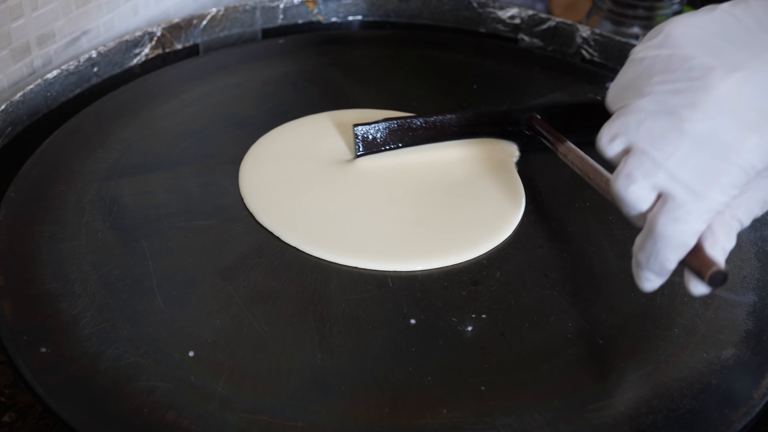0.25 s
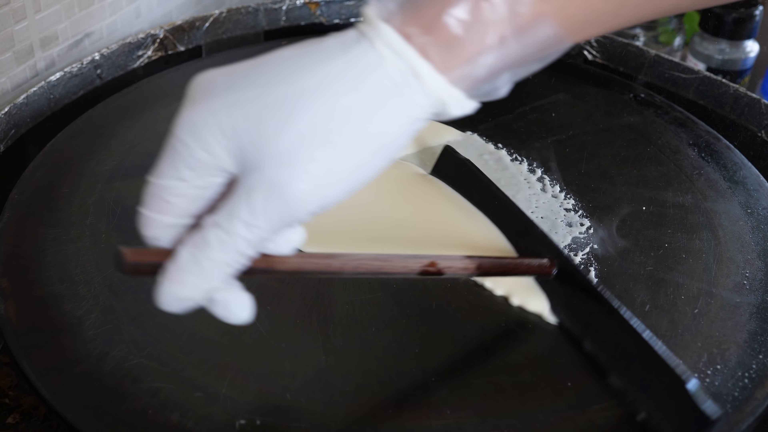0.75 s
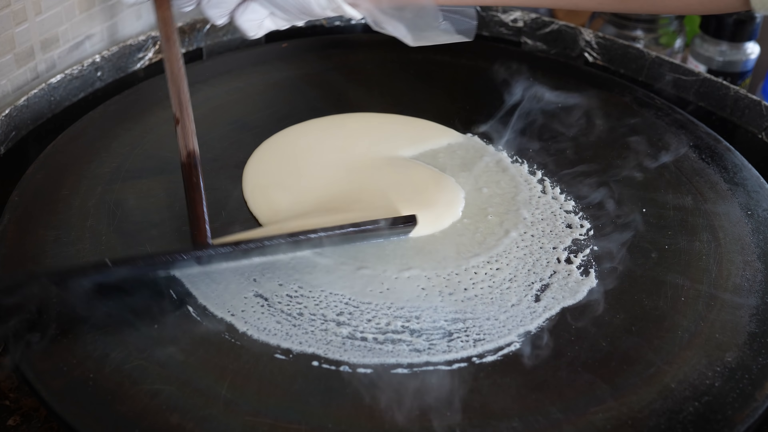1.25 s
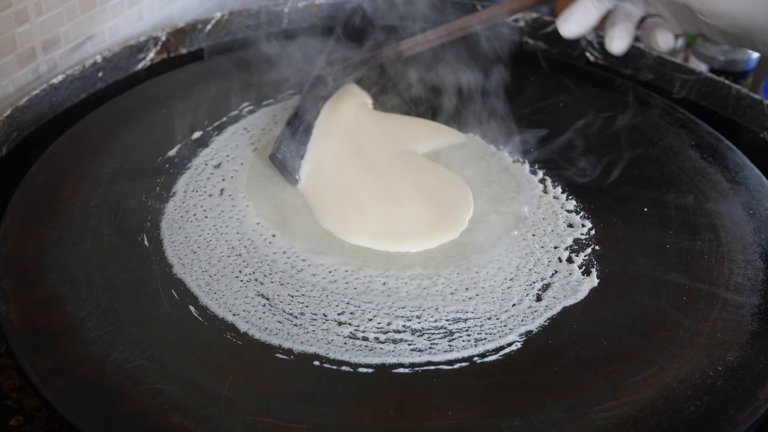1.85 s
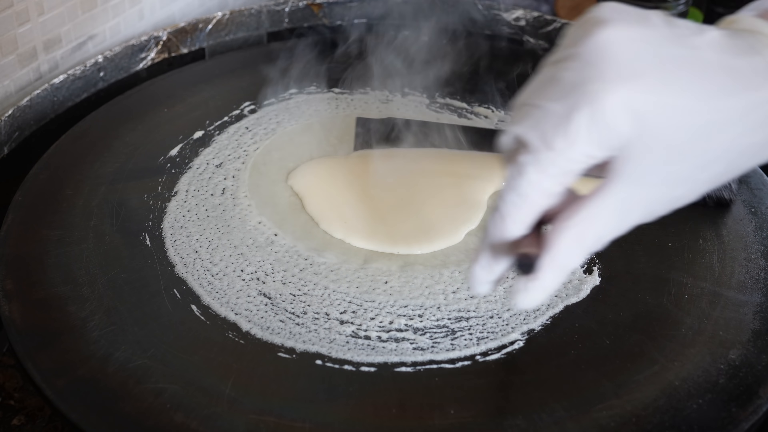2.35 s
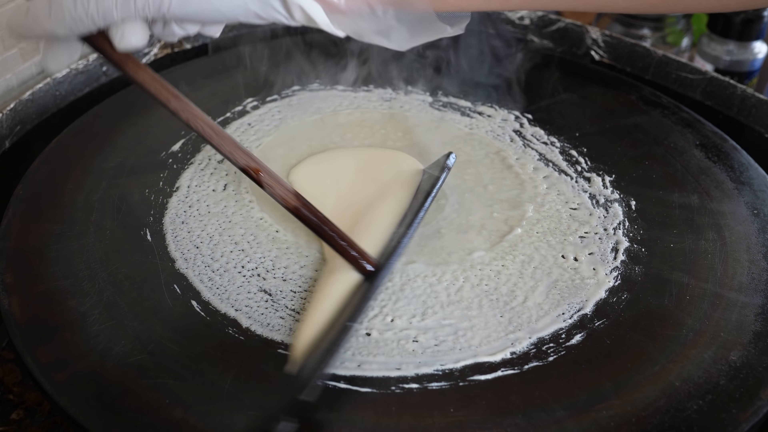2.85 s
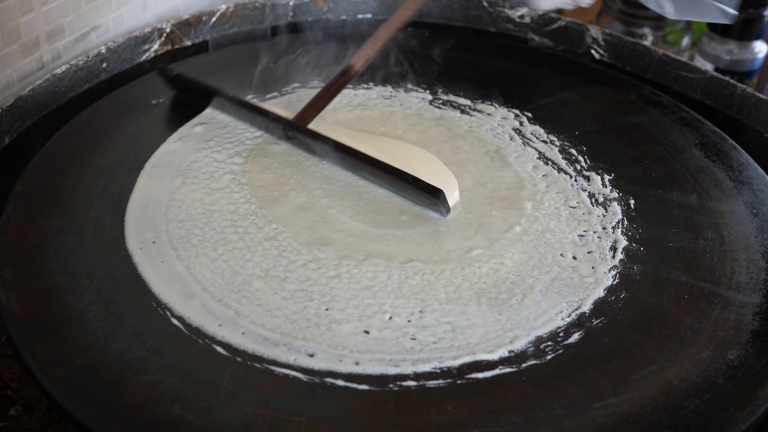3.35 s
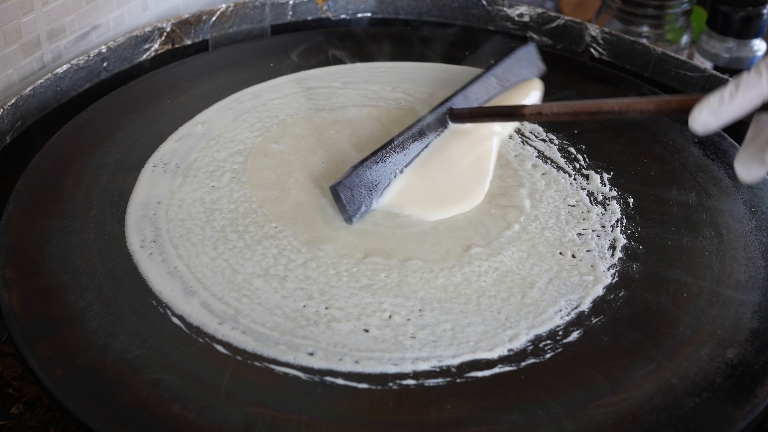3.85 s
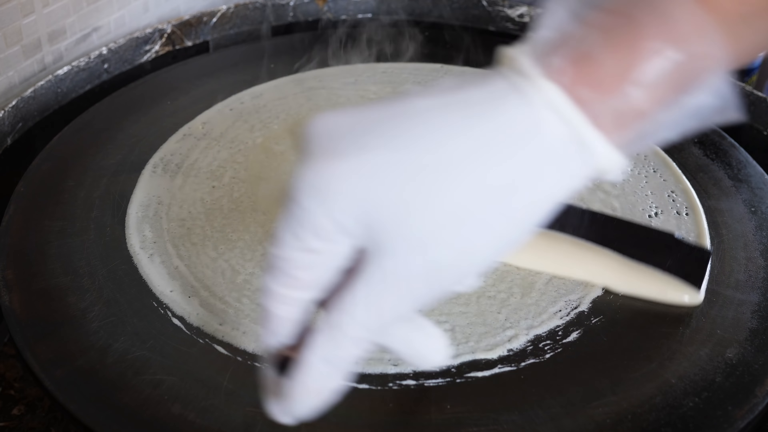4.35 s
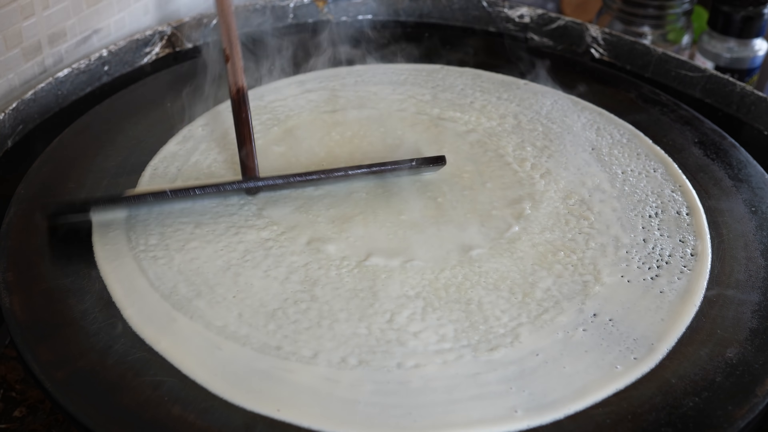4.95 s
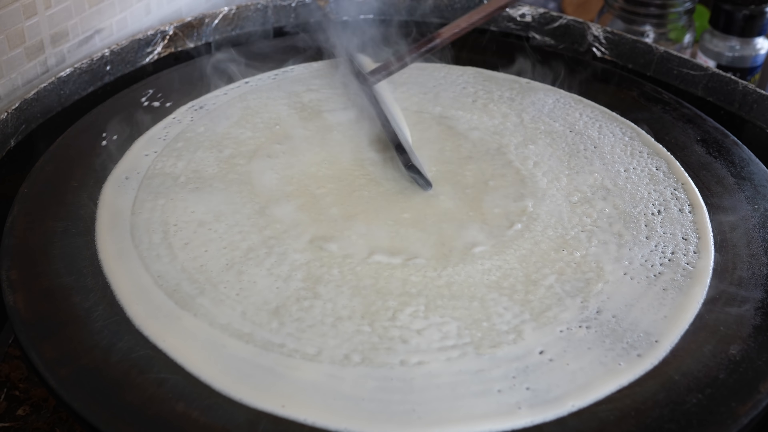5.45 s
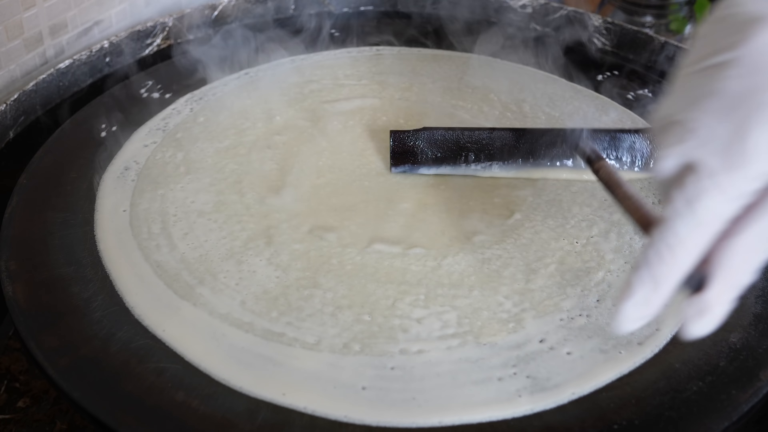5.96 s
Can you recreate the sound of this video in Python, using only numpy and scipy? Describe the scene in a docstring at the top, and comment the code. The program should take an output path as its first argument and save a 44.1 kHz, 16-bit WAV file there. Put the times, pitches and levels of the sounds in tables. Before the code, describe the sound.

A single close microphone at a food stall hears wet batter frying on an iron plate. Fine crackling flares at once and again after a second, joined by hollow steam hisses, loud pops and gurgling batter. Wooden scrapes and light taps come early. From about two seconds the sizzle thins away, leaving quiet simmering, soft steam wafts, a short high whistle and low machine hum.

```python
"""At a stall, batter is swept round a hot griddle with a wooden spreader, close to one microphone.
Tiny steam bubbles make a dense sizzle of random pops and noise; it flares and fades as the batter sets.
Larger pops make thick batter bubble lower down, and shaped noise makes soft steam, spurts and hollow hisses.
Rising tones squeal, loud spits burst, and the spreader rasps and ticks on the iron.
Below it all are a low rumble and a machine hum."""
import sys
import numpy as np
from scipy import signal
from scipy.fft import rfft, irfft, next_fast_len
from scipy.io import wavfile
from scipy.ndimage import uniform_filter1d

SR = 44100
rng = np.random.default_rng(int(sys.argv[2]) if len(sys.argv) > 2 else 0)


def file_out(sig):
    """Save sig as 16-bit WAV at sys.argv[1]."""
    # one column per channel
    cols = np.atleast_2d(sig).T
    # limit, then scale
    lim = np.clip(cols, -1, 1)
    pcm = np.round(lim * 32767).astype(np.int16)
    wavfile.write(sys.argv[1], SR, pcm)


N = 273331
TIME = np.arange(N) / SR  # [s]
EDGE_HZ = 15800  # top of the recorder's range

# resonances of the griddle plate: (pitch [Hz], width [Hz], strength of the added ring [dB])
GRIDDLE_RESONANCES = [(425, 27, 4.5), (535, 18, 6), (667, 12, 6.5), (1103, 44, -0.5), (1740, 46, -5),
                      (2745, 70, -14)]

# colour of the low rumble around the stall: (frequency [Hz], level [dB])
RUMBLE_COLOUR = [(5, -89), (14, -52), (24, -82.5), (36, -78), (58, -78.5), (80, -82.5), (150, -84),
                 (200, -93), (300, -97), (420, -97), (620, -103), (15000, -115)]
# hum of two machines around the stall: (pitch [Hz], level [dB], waver of the phase [radians])
MACHINE_HUM = [(49.8, -67.5, .3), (61, -63, 0.57), (100.3, -71, 0.18)]

# colour of the bursting fine bubbles: (frequency [Hz], level [dB])
SIZZLE_COLOUR = [(300, -32), (900, -28), (1350, -9.5), (1900, -6), (3000, -3), (4100, 1.37), (5400, -1.5),
                 (6800, 0), (8400, -3.5), (9400, -2.3), (10900, -4.5), (15500, -5)]
# flares as batter is pushed onto hot iron; levels are before the sizzle's final trim:
# (peak time [s], level [dB], rise [s], fall [s], fine fizz relative to that level [dB])
SIZZLE_FLARES = [(.07, -42, 0.027, 0.32, 7), (.78, -42, 0.15, 0.14, 5.5), (1.16, -37, 0.16, 0.33, 4),
                 (1.7, -42, 0.17, 0.096, 6.5), (1.87, -41.5, 0.04, 0.038, 0),
                 (2.09, -39.5, 0.089, 0.063, 3.5), (2.32, -50.5, 0.23, 0.14, 7.5),
                 (2.98, -44, 0.13, 0.15, 3.5), (3.4, -51, 0.032, 0.14, 5), (3.94, -46.5, 0.088, 0.19, -0.5),
                 (5.33, -55, 0.27, 0.36, 3)]
# the sizzle holds while the batter is wet, then dies to a faint simmer; levels are before the final trim
SIZZLE_DB, WET_UNTIL_S, SETTING_DB_PER_S, SIMMER_DB = -39.5, 1.73, 7.5, -60.5
FIZZ_DB, SIMMER_FIZZ_DB = 0.5, 2  # finest bubbles relative to the sizzle, wet and simmering
POP_SHARE, SET_POP_SHARE = 0.64, 0.29  # share of power in separate pops, fierce and faint
FIERCE_DB = -52  # sizzle level halfway between these two shares

# colour of small bubbles in thick batter: (frequency [Hz], level [dB])
BUBBLE_COLOUR = [(200, -28.5), (630, -16), (800, -1), (1100, -1), (2300, -3), (4500, -9.5), (9000, -37)]
# colour of slow, large bubbles: (frequency [Hz], level [dB])
GURGLE_COLOUR = [(70, -28), (160, 5.5), (285, 6.5), (350, -6.5), (450, 2.5), (600, 0.5), (720, 3),
                 (1100, 4), (3000, -38)]
# the spreader ploughs through the pool of batter:
# (peak time [s], bubbling level [dB], rise [s], fall [s], large bubbles relative to that level [dB])
POOL_PUSHES = [(.59, -46.5, 0.16, 0.23, -6.5), (.79, -48, 0.032, 0.018, -3.5), (1.7, -67.5, 0.12, 0.35, 6),
               (2.04, -50, 0.19, 0.11, -5), (2.3, -47.5, 0.2, 0.13, -7), (2.53, -49.5, 0.022, 0.027, -23),
               (3.87, -58.5, 0.17, 0.43, -20), (5.1, -70, 0.3, 1, -19)]
# the pool bubbles steadily until it is spread thin; the gurgle is relative to the pool
POOL_DB, POOL_GURGLE_DB, POOL_UNTIL_S, THINNING_DB_PER_S = -52.5, -8, 1.9, 9.5

# colour of soft steam: (frequency [Hz], level [dB])
STEAM_COLOUR = [(600, -21), (1200, -10.5), (1700, -3.5), (3000, 2.5), (4600, 2), (6500, -7), (9000, -12),
                (15000, -54)]
# soft steam leaves the thin film behind the spreader: (peak time [s], level [dB], rise [s], fall [s])
STEAM_WAFTS = [(0.548, -44, 0.33, .25), (1.38, -47.5, 0.24, 0.39), (3.88, -50.5, 0.25, 0.11),
               (4.3, -53.5, 1, 1), (5.07, -48, 0.055, 0.13), (5.27, -50.5, 0.15, 0.27)]

# wet batter meets fresh iron, strongest a third of the way in: (start [s], level [dB], length [s])
STEAM_SPURTS = [(0.052, -34, 0.03), (1.53, -37, 0.011), (2.481, -34.5, 0.013), (2.724, -38.5, 0.013),
                (3.38, -43, 0.039), (3.799, -39, 0.05), (3.834, -42.5, 0.03)]

# single loud spits, with levels before the echoes and plate: (time [s], peak level [dB])
LOUD_SPITS = [(.199, -18), (.264, -28), (1.283, -15), (1.374, -17), (1.423, -13), (1.428, -8), (1.516, -10),
              (1.547, -6), (1.883, -12.5), (2.033, -14.5), (2.079, -17), (2.098, -21), (2.107, -9.5),
              (2.631, -17), (2.941, -20), (3.111, -28), (3.279, -20), (3.662, -21)]

# the wooden bar rasps over the iron until it lifts:
# (start [s], end [s], level [dB], first pitch [Hz], last pitch [Hz])
SPREADER_SCRAPES = [(0.318, .63, -43.5, 2250, 1760), (0.647, .82, -50, 1900, 2300),
                    (2.224, 2.563, -51, 1200, 1800), (5.623, 6.118, -68.5, 1300, 1100)]
SCRAPE_EDGE_S, SCRAPE_WIDTH_HZ = 0.016, 1600

# taps of the spreader, with levels before the echoes and plate: (time [s], peak level [dB])
SPREADER_TICKS = [(0.355, -29), (0.603, -26), (0.768, -34), (1.993, -29), (2.248, -26), (2.271, -28),
                  (2.361, -24), (2.37, -29), (2.437, -29.5), (2.541, -28), (2.546, -34), (2.71, -28.5),
                  (3.841, -31), (3.876, -29), (4.499, -34), (5.432, -32.5), (5.664, -29)]
# colour of the wooden bar before each tap shifts its pitch: (frequency [Hz], level [dB])
TICK_COLOUR = [(200, -25), (650, -13), (1050, -3), (1400, 2.5), (2600, -4), (4500, -13), (12000, -34)]

# steam escapes through gaps under the batter, each tuned by its size:
# (peak time [s], level [dB], rise [s], fall [s], pitch at the peak [Hz], width [Hz])
STEAM_VENTS = [(1.19, -42, 0.11, 0.062, 7100, 2400), (1.27, -42, 0.042, .03, 4030, 1100),
               (1.409, -38.5, .08, .05, 5000, 2000), (1.545, -37, 0.035, 0.026, 6500, 1200),
               (1.66, -41.5, 0.097, 0.093, 4100, 1900), (1.739, -40, 0.026, .025, 6840, 1300),
               (1.62, -54.5, 0.11, 0.19, 360, 200), (3.42, -54, .04, 0.061, 2770, 800),
               (3.971, -52, 0.29, 0.29, 4200, 1200), (5.08, -51.5, 0.023, 0.025, 4200, 1400),
               (5.27, -54.5, 0.11, 0.27, 3060, 900), (5.35, -59, .15, .2, 5000, 1600)]
VENT_SAG_OCTAVES_PER_S = 0.23

# steam squeals through a pinhole: (start [s], climb [s], first pitch [Hz], top pitch [Hz])
PINHOLE_SQUEALS = [(3.55, 0.037, 5720, 5840), (4.362, 0.103, 7010, 8180)]
# squeals come in puffs as the pinhole narrows and reopens: (peak time [s], level [dB], rise [s], fall [s])
SQUEAL_PUFFS = [(3.59, -44, 0.013, 0.015), (4.39, -38.5, 0.019, .016), (4.446, -41, 0.023, 0.011),
                (4.463, -35, .008, 0.008), (4.492, -33, 0.0081, .006), (4.51, -33.5, .009, 0.0079),
                (4.56, -36, 0.022, 0.013), (4.602, -44.5, 0.01, 0.036)]
SQUEAL_LONGEST_S = .45  # a squeal owns the puffs that peak this soon after its start


def amp(db):
    """Decibels to gain."""
    return 10 ** (np.asarray(db) / 20)


def unit(x):
    """Scales to rms 1."""
    return x / np.sqrt(np.mean(x ** 2) + 1e-20)


def spectrum(points, hz):
    """Reads (Hz, dB) points on a log-frequency axis."""
    f, db = np.transpose(points)
    return np.interp(np.log(hz + 1), np.log(f), db)


def add(mix, s, sound):
    """Mixes a sound in at time s."""
    part = mix[max(round(s * SR), 0):][:len(sound)]
    part += sound[:len(part)]


def impulse(points, size=4096):
    """Makes a click with this colour and no sound ahead of its start."""
    log_gain = np.log(amp(spectrum(points, abs(np.fft.fftfreq(size, 1 / SR)))))
    return np.fft.ifft(np.exp(np.conj(signal.hilbert(log_gain)))).real[:size // 2]


def filtered(x, gain):
    """Applies a gain, given as a function of frequency, without delay."""
    size = next_fast_len(N)
    return irfft(rfft(x, size) * gain(np.fft.rfftfreq(size, 1 / SR)), size)[:N]


def coloured(x, points, band):
    """Colours x and gives it an average strength (rms) of 1 inside the band [Hz]."""
    sound = signal.oaconvolve(x, impulse(points))[:N]
    return sound / np.std(filtered(sound, lambda hz: (hz > band[0]) & (hz < band[1])))


def wander(rate_hz):
    """Smooth random drift of rms 1."""
    return unit(filtered(rng.standard_normal(N), lambda hz: 1 / (1 + (hz / rate_hz) ** 4)))


def swell(s, rise, fall):
    """A smooth hump of power that peaks at s."""
    return np.exp(-((TIME - s) / np.where(TIME < s, rise, fall)) ** 2)


def dying(db, until_s, db_per_s):
    """Power that holds, then falls steadily in dB."""
    return amp(db - db_per_s * np.maximum(TIME - until_s, 0)) ** 2


def resonate(x, hz, width):
    """A resonance that follows the pitch hz; gives rms 1."""
    turn = np.exp(2j * np.pi * np.cumsum(hz) / SR)
    r = np.exp(-np.pi * width / SR)
    # shift the pitch down to zero, smooth there, then shift back up
    smooth = signal.lfilter([1], [1, -2 * r, r * r], x / turn)
    return unit((turn * smooth).real)


def echoes(wet_db, t60, size=6000):
    """A direct path, one bounce off the iron, then scattered echoes of the stall."""
    t = np.arange(size) / SR
    scattered = rng.standard_normal(size) * (rng.random(size) < .06)
    tail = scattered * amp(-60 * t / t60) * (t > .001)
    path = amp(wet_db) * tail / np.linalg.norm(tail)
    path[0] = 1
    path[1 + int(rng.uniform(.0002, .003) * SR)] += .3
    return path


def pops(per_s, spread_db, largest_db, clump_db, wet_db, count=8):
    """Bubbles of very unequal size burst in clumps, at spots that each have their own echoes."""
    size_db = np.minimum(spread_db * rng.exponential(1, N), largest_db)
    size = amp(size_db + clump_db * wander(28))
    train = size * (rng.random(N) < per_s / SR) * rng.choice([-1, 1], N)
    spot = rng.integers(0, count, N)
    out = np.zeros(N)
    for k in range(count):
        out += signal.oaconvolve(train * (spot == k), echoes(wet_db, 0.071))[:N]
    return unit(out)


def ringing(per_s, low_hz, high_hz, cycles):
    """Some bubbles ring for a moment, each at the pitch of its size, rising as it opens."""
    size = amp(np.minimum(1.7 * rng.exponential(1, N), 13)) * (rng.random(N) < per_s / SR)
    hz = low_hz * (high_hz / low_hz) ** rng.random(N)
    out = np.zeros(N)
    for at in np.flatnonzero(size):
        age = np.arange(0, 5, hz[at] / cycles / SR)  # counted in decay times
        wave = np.sin(2 * np.pi * cycles * age * (1 + 0.0045 * age))
        ring = hz[at] / low_hz * np.exp(-age) * wave
        add(out, at / SR, size[at] * ring)
    return unit(out)


def knock(colour, wet_db, t60):
    """One sharp impulse of this colour, with its echoes."""
    shape = impulse(colour)
    return signal.fftconvolve(shape / abs(shape).max(), echoes(wet_db, t60))


def griddle(x):
    """The plate lifts narrow bands of whatever sounds on it."""
    out = x.copy()
    for hz, width, db in GRIDDLE_RESONANCES:
        out += amp(db) * signal.lfilter(*signal.iirpeak(hz, hz / width, SR), x)
    return out


def room():
    """Uneven low rumble from shaped noise, and wavering hum tones around the stall."""
    noise = rng.standard_normal(N)
    rumble = filtered(noise, lambda hz: amp(spectrum(RUMBLE_COLOUR, hz))) * np.sqrt(SR / 2)
    hum = np.zeros(N)
    for hz, db, waver in MACHINE_HUM:
        hum += amp(db) * np.sqrt(2) * np.sin(2 * np.pi * hz * TIME + waver * wander(2.3))
    return rumble * amp(1.26 * wander(5)) + hum


def sizzle():
    """Sharp pops over the blur of countless smaller bubbles; flares change the level and the fine fizz."""
    wet = dying(SIZZLE_DB, WET_UNTIL_S, SETTING_DB_PER_S)
    body = wet + amp(SIMMER_DB) ** 2
    fizz = wet * amp(FIZZ_DB) ** 2 + amp(SIMMER_DB + SIMMER_FIZZ_DB) ** 2
    for s, db, rise, fall, fizz_db in SIZZLE_FLARES:
        flare = amp(db) ** 2 * swell(s, rise, fall)
        body = body + flare
        fizz = fizz + flare * amp(fizz_db) ** 2

    # a fiercer sizzle has a greater share of separate pops
    fierceness = body / (body + amp(FIERCE_DB) ** 2)
    share = np.clip(SET_POP_SHARE + (POP_SHARE - SET_POP_SHARE) * fierceness, 0, 1)
    near = pops(per_s=6000, spread_db=4.0, largest_db=22.5, clump_db=0.5, wet_db=-2.5, count=12)
    rings = ringing(per_s=790, low_hz=1508, high_hz=13050, cycles=37)
    blur = unit(rng.standard_normal(N) + amp(-9.0) * rings)
    sound = np.sqrt(share) * near + np.sqrt(1 - share) * blur
    sound = coloured(sound, SIZZLE_COLOUR, (2500, 5500))

    hz, t, z = signal.stft(sound, SR, nperseg=512)
    # the smallest bubbles make the top of the spectrum
    fine = np.clip(np.log((hz + 1) / 4300) / np.log(12500 / 4300), 0, 1)[:, None]
    fine_db = np.interp(t, TIME, 10 * np.log10(fizz / body))
    # fierce crackling adds a keen band of its own
    keen = np.exp(-((hz - 6700) / 1000) ** 2)[:, None] * np.interp(t, TIME, body / body.max())
    # the moving hand and spreader shift the colour in patches
    patches = uniform_filter1d(rng.standard_normal(z.shape), size=4, axis=0)
    patches = unit(uniform_filter1d(patches, size=24, axis=1))
    z = z * amp(fine * fine_db + 0.35 * keen + 1.78 * patches)
    sound = signal.istft(z, SR, nperseg=512)[1][:N]
    return amp(-1.93) * np.sqrt(body) * sound  # final trim


def bubbling():
    """Fewer, larger bubbles break through the thick batter, with swells where the spreader pushes it."""
    bubbles = dying(POOL_DB, POOL_UNTIL_S, THINNING_DB_PER_S)
    gurgle = bubbles * amp(POOL_GURGLE_DB) ** 2
    for s, db, rise, fall, gurgle_db in POOL_PUSHES:
        push = amp(db) ** 2 * swell(s, rise, fall)
        bubbles = bubbles + push
        gurgle = gurgle + push * amp(gurgle_db) ** 2
    small = pops(per_s=1500, spread_db=6.0, largest_db=11.5, clump_db=0.5, wet_db=-4, count=14)
    small = small + amp(-21.5) * ringing(per_s=360, low_hz=671, high_hz=3280, cycles=4.5)
    large = pops(per_s=900, spread_db=8.0, largest_db=16.0, clump_db=1.0, wet_db=-7.5)
    small = coloured(griddle(small), BUBBLE_COLOUR, (750, 1500))
    large = coloured(griddle(large), GURGLE_COLOUR, (220, 600))
    return np.sqrt(bubbles) * small + np.sqrt(gurgle) * large


def steam():
    """Steam from the thin film is a smooth, duller hiss of shaped noise."""
    power = sum(amp(db) ** 2 * swell(s, rise, fall) for s, db, rise, fall in STEAM_WAFTS)
    return np.sqrt(power) * unit(coloured(rng.standard_normal(N), STEAM_COLOUR, (0, SR)))


def spurts():
    """Brief jets of steam are noise with a quick rise and a softer fall."""
    strength = np.zeros(N)
    for s, db, length in STEAM_SPURTS:
        age = np.maximum(TIME - s, 0) / (length / 3)
        strength += amp(db) * age * np.exp(1 - age)
    return strength * unit(coloured(rng.standard_normal(N), SIZZLE_COLOUR, (0, SR)))


def spits():
    """The largest blisters burst one by one, each a sharp knock with echoes."""
    out = np.zeros(N)
    for s, db in LOUD_SPITS:
        add(out, s, amp(db) * knock(SIZZLE_COLOUR, wet_db=-2, t60=0.06))
    return out


def scrapes():
    """Tiny uneven slips of wood on iron, through a resonance that moves as the bar turns."""
    out = np.zeros(N)
    slips = pops(per_s=1100, spread_db=2, largest_db=11.5, clump_db=1.5, wet_db=-7, count=4)
    for start, end, db, first_hz, last_hz in SPREADER_SCRAPES:
        on = (TIME > start) & (TIME < end)
        nearest_end = np.minimum(TIME[on] - start, end - TIME[on])
        press = np.clip(nearest_end / SCRAPE_EDGE_S, 0, 1)
        pitch = np.linspace(first_hz, last_hz, on.sum())
        out[on] += amp(db) * press * resonate(slips[on], pitch, SCRAPE_WIDTH_HZ)
    return out


def ticks():
    """The bar taps the iron, each time with a slightly different pitch."""
    out = np.zeros(N)
    for (s, db), chance in zip(SPREADER_TICKS, rng.standard_normal(len(SPREADER_TICKS))):
        colour = [(hz * 2 ** (0.14 * chance), level) for hz, level in TICK_COLOUR]
        add(out, s, amp(db) * knock(colour, wet_db=-3, t60=0.06))
    return out


def vents():
    """Resonant noise makes hollow hisses whose pitch sinks as the gap widens."""
    out = np.zeros(N)
    for s, db, rise, fall, hz, width in STEAM_VENTS:
        t = np.arange(-3 * rise, 3 * fall, 1 / SR)  # zero at the peak
        flow = np.exp(-.5 * (t / np.where(t < 0, rise, fall)) ** 2)
        pitch = hz * 2 ** (-VENT_SAG_OCTAVES_PER_S * t)
        hiss = resonate(rng.standard_normal(len(t)), pitch, width)
        add(out, s + t[0], amp(db) * flow * hiss)
    return out


def squeal(start, climb, first_hz, top_hz):
    """A pinhole whistles upward in puffs, fluttering while it climbs, with a rush of steam just below."""
    age = np.maximum(TIME - start, 0)
    pressure = uniform_filter1d(np.minimum(age / climb, 1) ** 2, size=600)
    hz = first_hz + (top_hz - first_hz) * pressure
    power = np.zeros(N)
    for s, db, rise, fall in SQUEAL_PUFFS:
        if 0 < s - start < SQUEAL_LONGEST_S:
            power += amp(db) ** 2 * swell(s, rise, fall)
    # the faster the pitch climbs, the more it flutters
    climb_speed = abs(np.gradient(hz)) * SR  # [Hz per s]
    flutter = np.clip(uniform_filter1d(climb_speed / 9000, size=1500), 0, 1)
    wavering_hz = hz + 70 * flutter * wander(400) + 18 * wander(38)
    phase = 2 * np.pi * np.cumsum(wavering_hz) / SR
    tone = np.sin(phase) * (1 + 0.87 * flutter * np.tanh(wander(200)))
    rush = amp(-16.5 + 5.5 * flutter) * resonate(rng.standard_normal(N), hz - 380, 750)
    return np.sqrt(power) * (tone + rush)


def scene():
    """All sources reach one microphone, the same in both channels."""
    on_plate = griddle(sizzle() + steam() + spurts() + spits() + scrapes() + ticks())
    squeals = sum(squeal(*row) for row in PINHOLE_SQUEALS)
    mono = room() + on_plate + bubbling() + vents() + squeals
    return np.array([mono, mono])


def record(dry):
    """The recorder's band limit takes away the highest treble."""
    low_pass = signal.firwin(511, EDGE_HZ, window=("kaiser", 9), fs=SR)
    return signal.oaconvolve(dry, low_pass[None], "same")


dry = scene()
out = record(dry)
file_out(out)
```